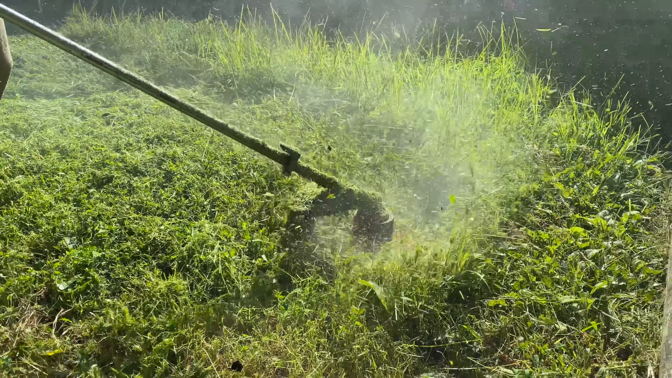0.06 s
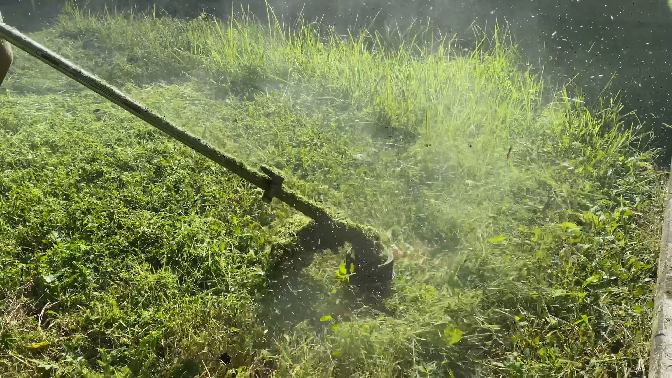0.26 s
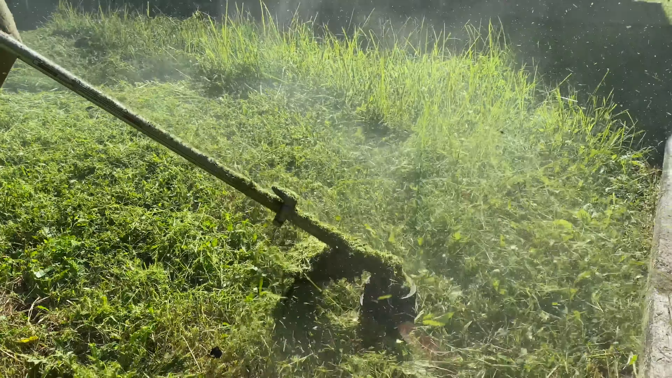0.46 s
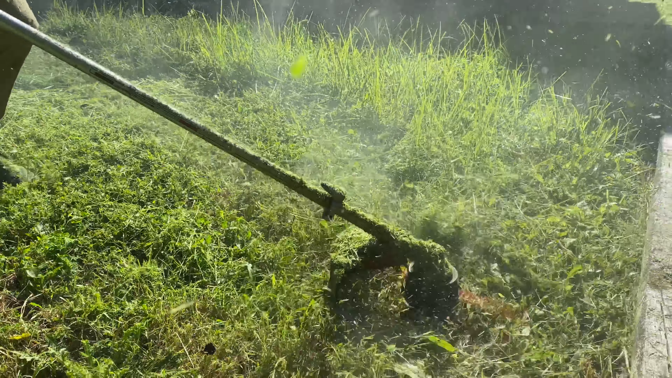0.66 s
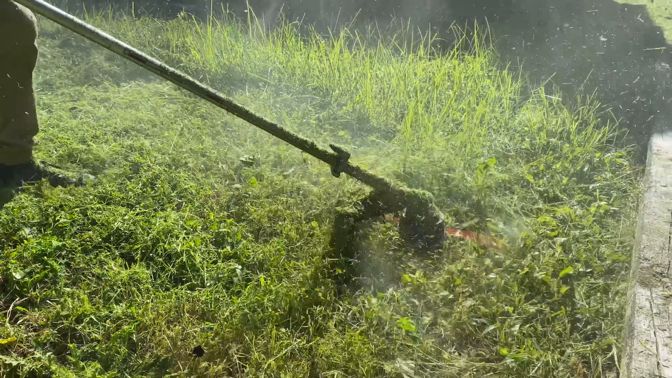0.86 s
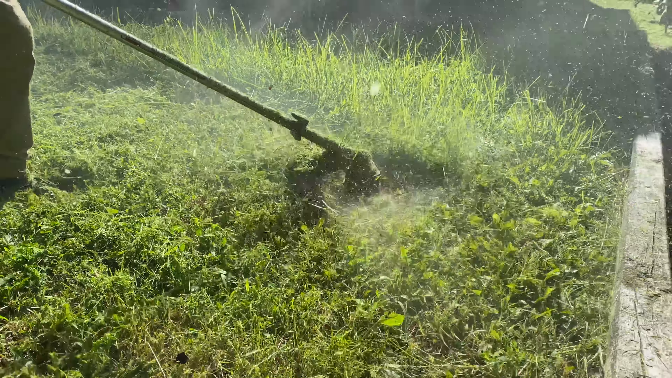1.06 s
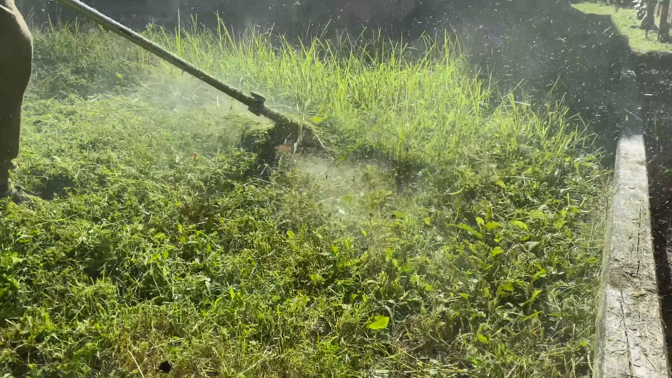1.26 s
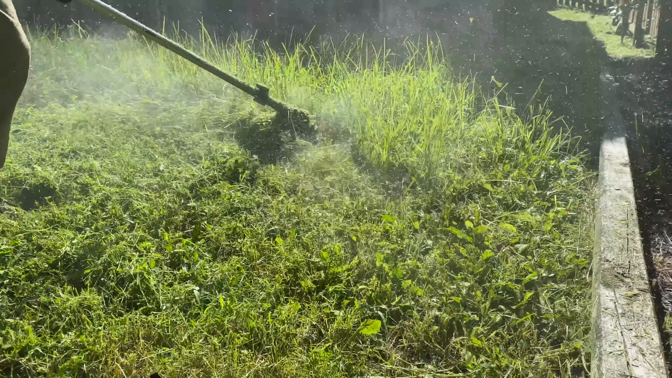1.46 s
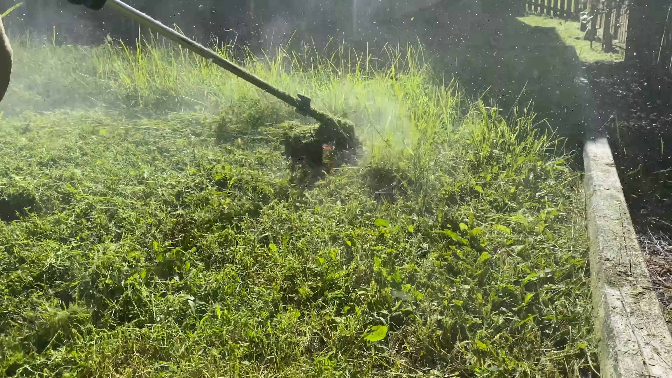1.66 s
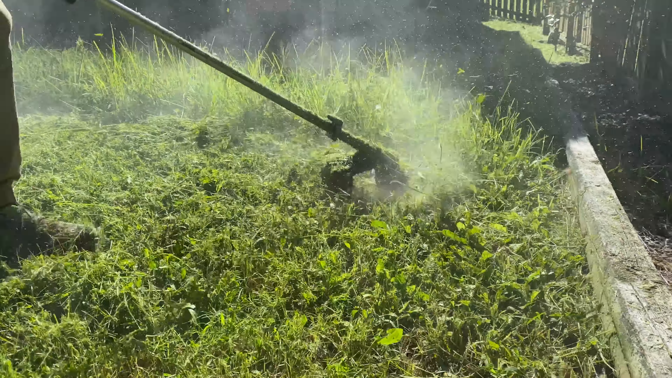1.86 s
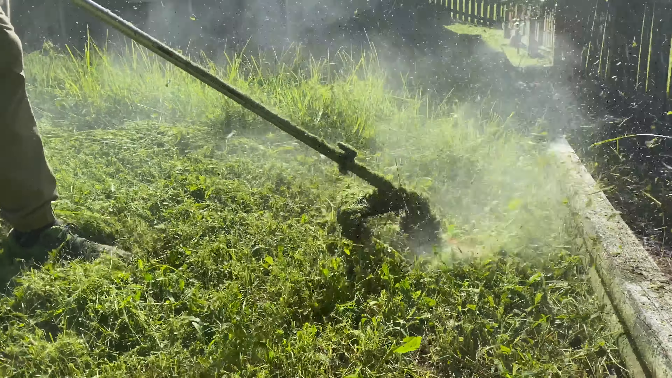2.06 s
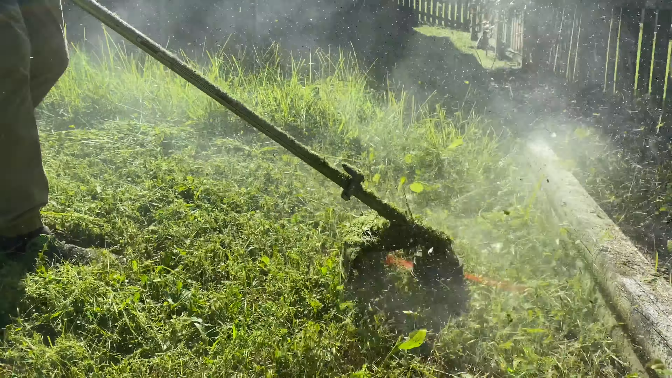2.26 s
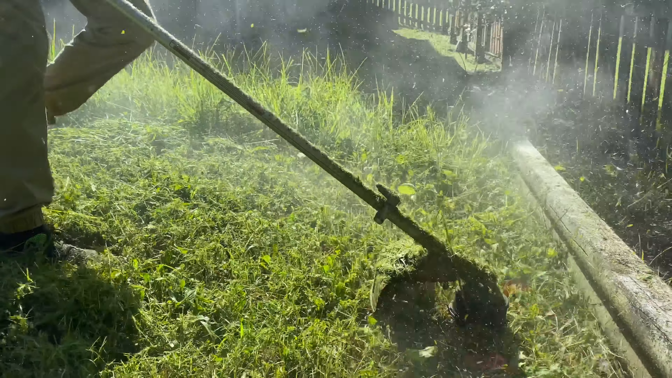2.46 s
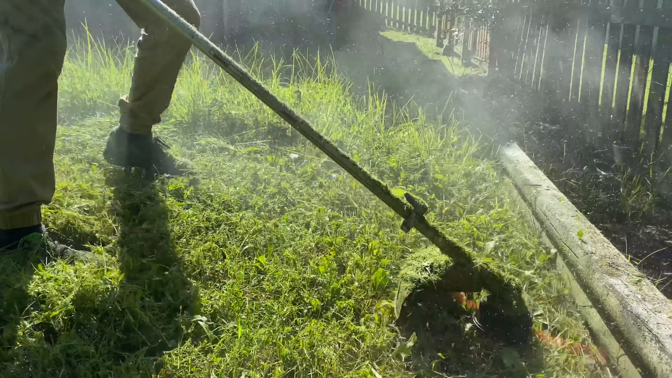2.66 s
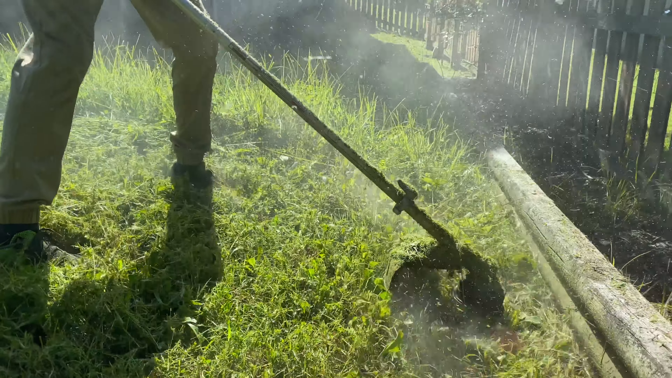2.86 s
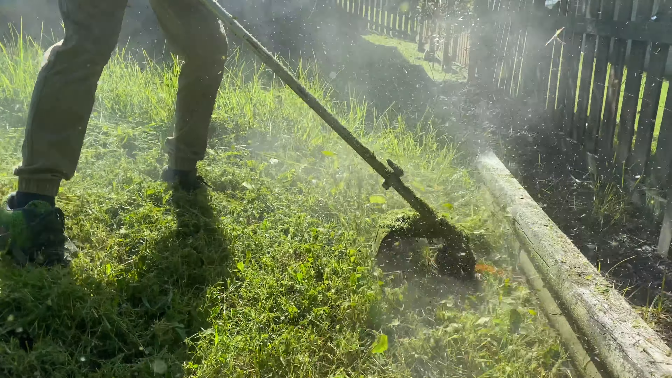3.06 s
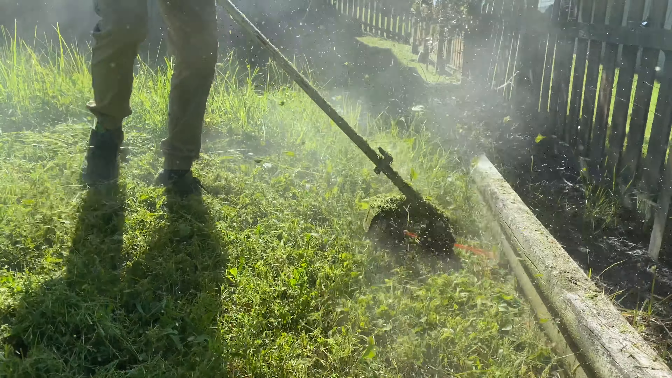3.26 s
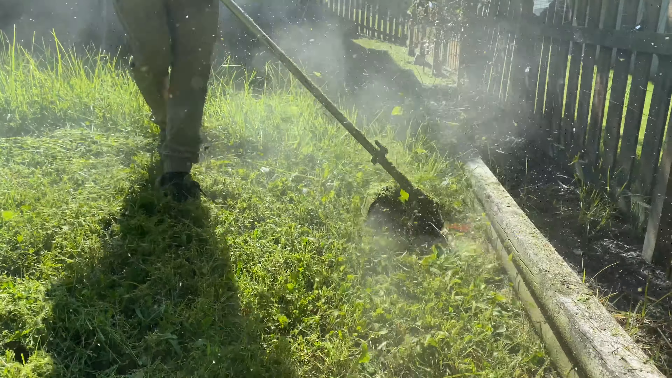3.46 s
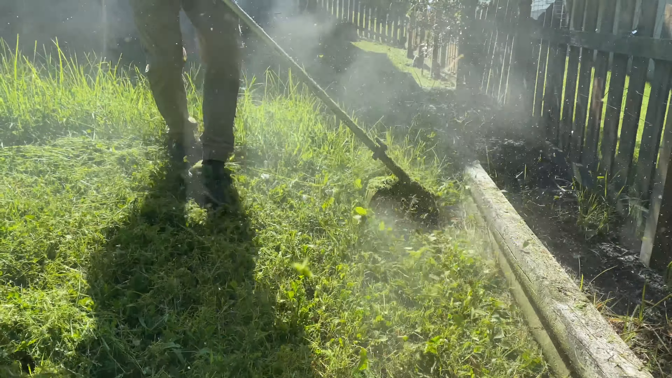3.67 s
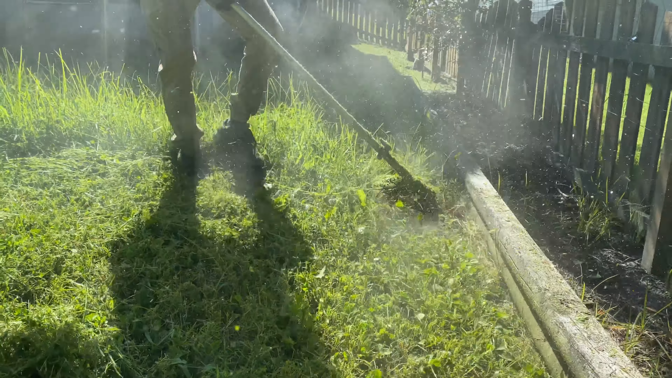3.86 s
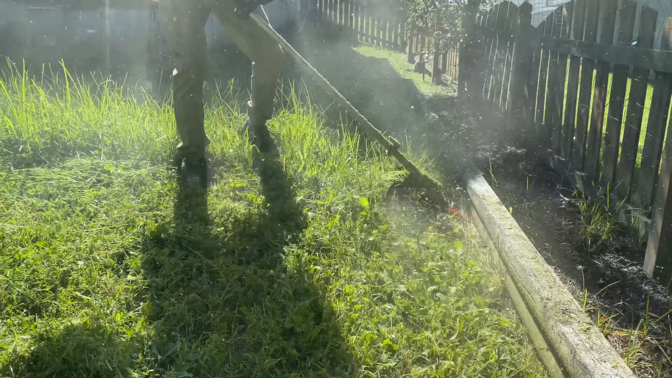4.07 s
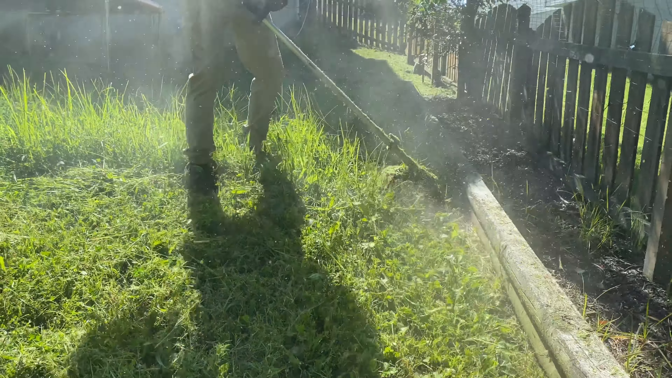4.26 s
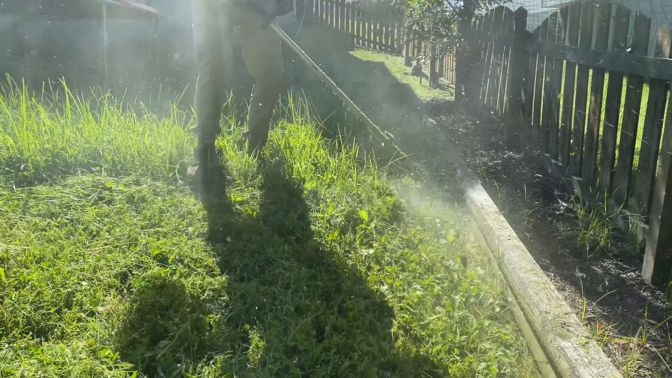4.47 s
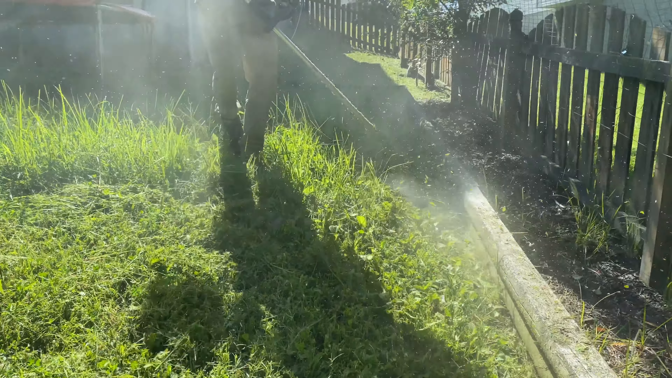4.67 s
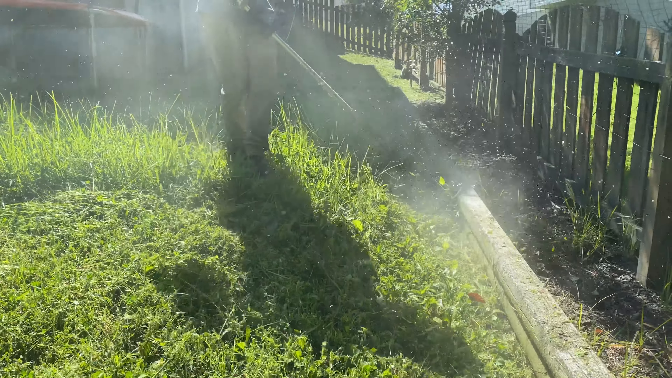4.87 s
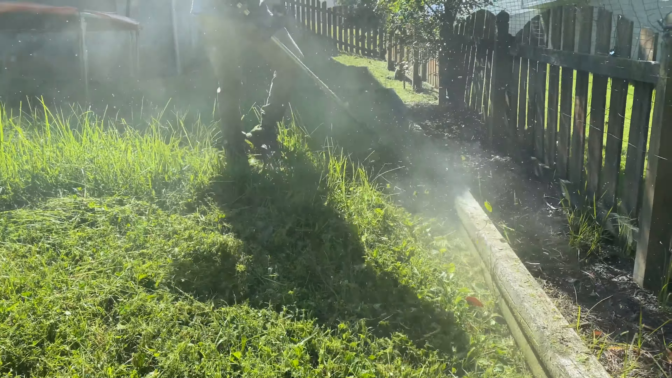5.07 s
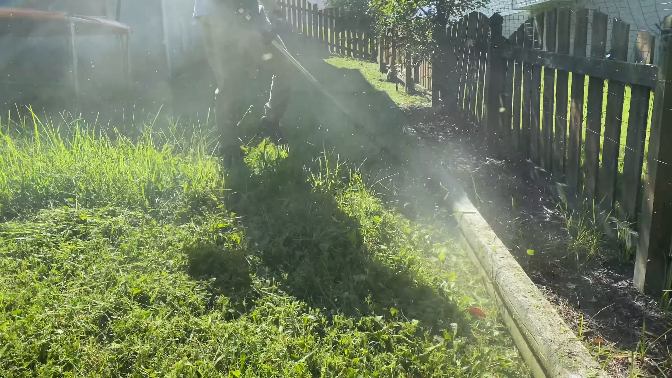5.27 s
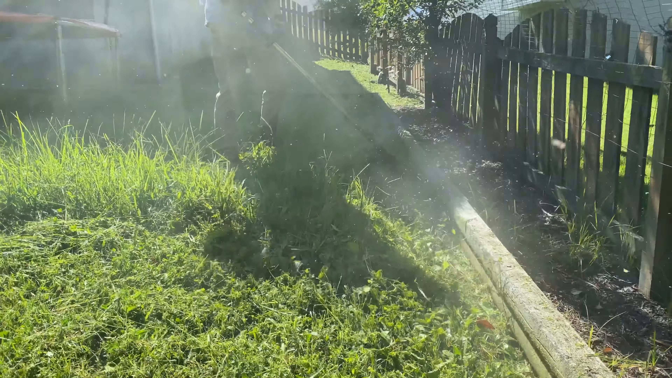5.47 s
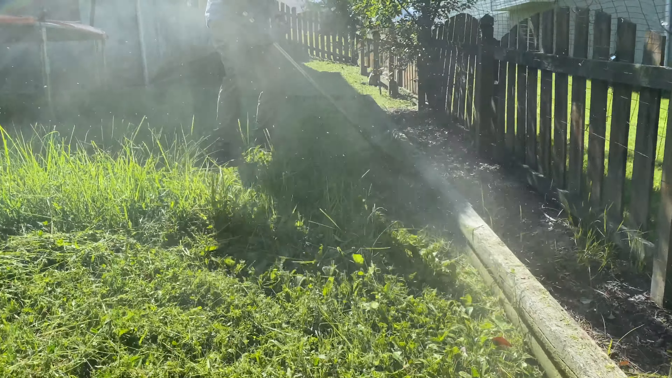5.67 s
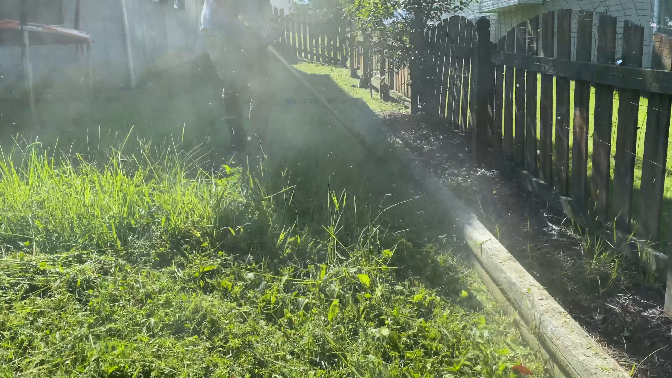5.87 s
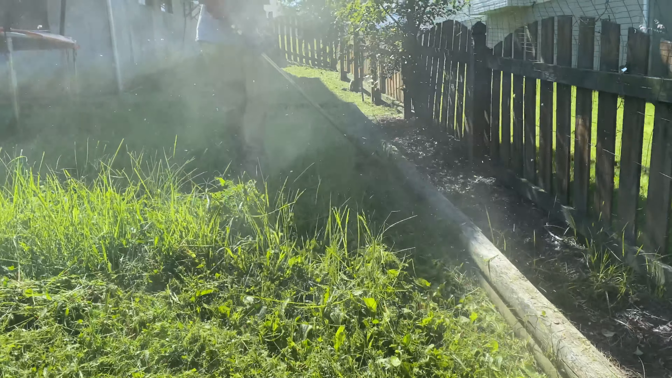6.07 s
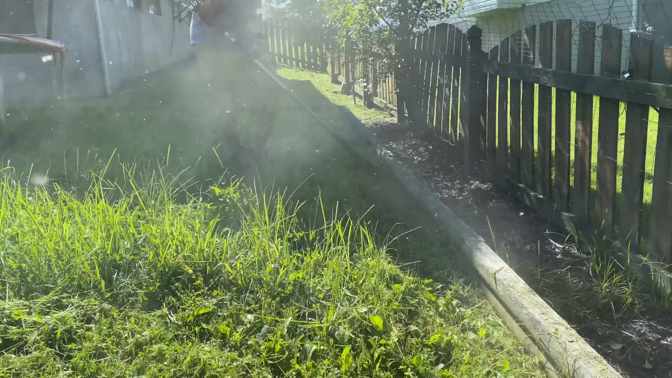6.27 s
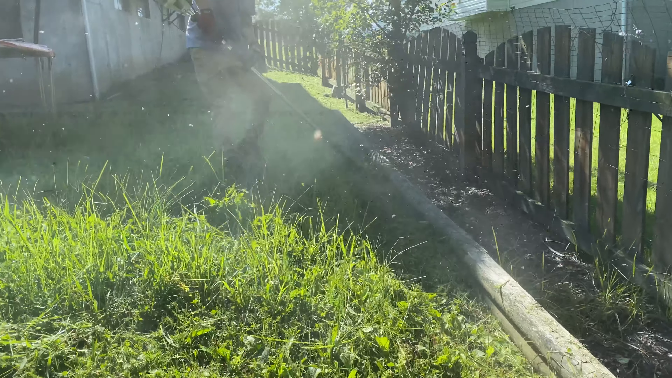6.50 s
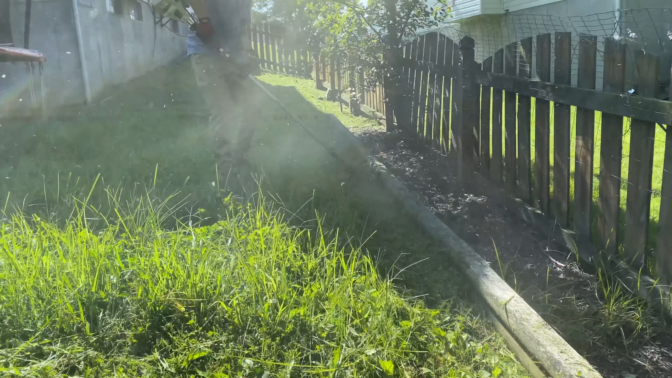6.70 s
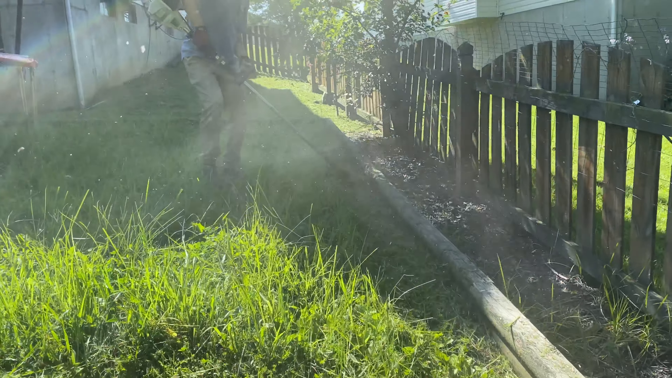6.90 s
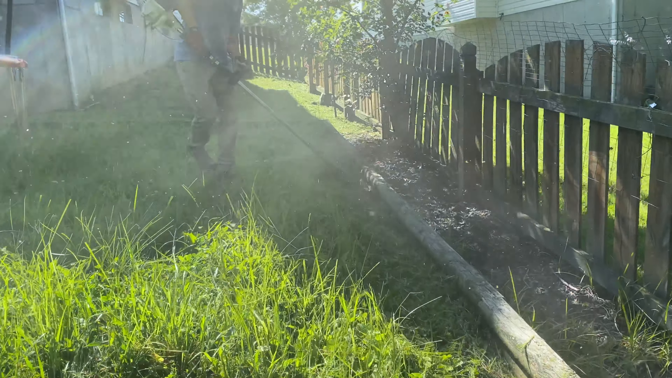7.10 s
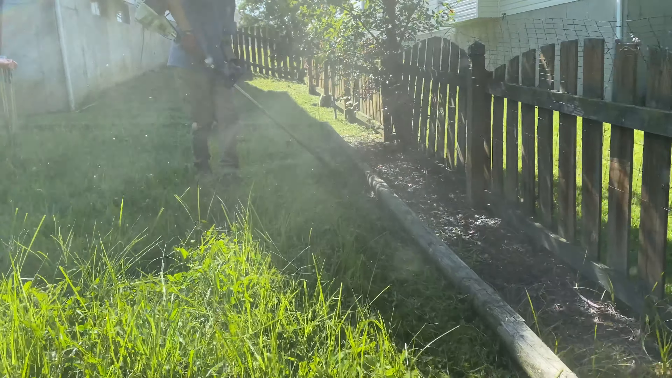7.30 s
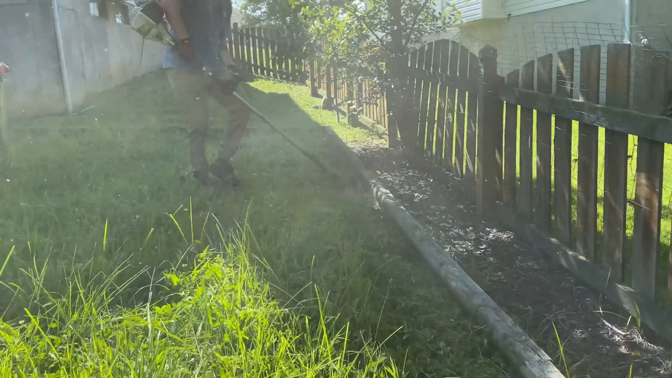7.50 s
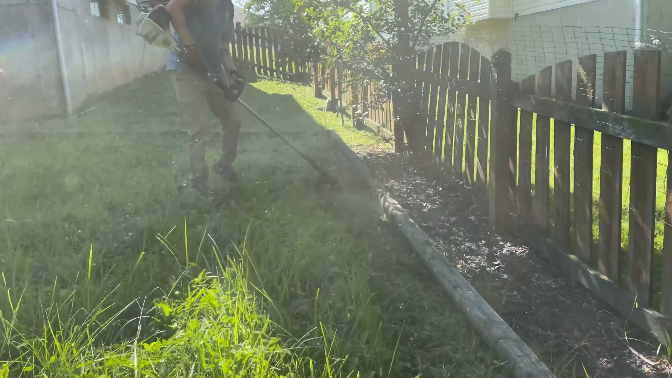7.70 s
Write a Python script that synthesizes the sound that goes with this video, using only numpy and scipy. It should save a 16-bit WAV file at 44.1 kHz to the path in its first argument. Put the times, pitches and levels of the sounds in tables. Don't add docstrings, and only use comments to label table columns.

```python
import sys
import numpy as np
from scipy import signal
from scipy.fft import rfft, irfft, next_fast_len
from scipy.io import wavfile
from scipy.ndimage import uniform_filter1d

SR = 44100
rng = np.random.default_rng(int(sys.argv[2]) if len(sys.argv) > 2 else 0)


def volts(x):
    e = np.asarray(x, float) / 20
    return 10 ** e


def output_pcm(signal):
    pcm = np.clip(np.atleast_2d(signal).T, -1, 1) * 32767
    wavfile.write(sys.argv[1], SR, np.round(pcm).astype(np.int16))


N = 341334

# t/s, firing rate f/Hz
ENGINE_SPEED = [(0, 71.75), (.407, 75.88), (1.065, 75.38), (1.474, 70.3), (1.768, 74.87), (2.102, 73.08),
                (2.276, 73.51), (2.682, 78.38), (3.074, 74.59), (3.508, 75.7), (4.195, 75.89),
                (5.203, 75.22), (5.727, 74.19), (6.244, 76.11), (6.889, 74.64), (7.486, 77.08),
                (7.74, 76.23)]
# t/s, sag f/Hz
BOGS = [
    (1.207, 1.33),
    (2.843, 0.85),
    (3.626, 0.77),
    (4.491, 1.45),
    (5.8, 1.13),
    (6.926, 1.9),
]
BOG_S, FLYWHEEL_S = 0.08, 0.14
# t/s, nearness, turn (both with spread 1)
MUFFLER_POSE = [(0, 1.4, -0.39), (.9, 1.6, 0.087), (1.5, 0.75, 0.26), (1.8, 1.74, -.1), (2.1, 1.2, 1.4),
                (2.4, .6, 1.5), (2.7, 1.2, 2.1), (3.3, 0.8, 1.8), (4.5, 0.47, 1.45), (5.0, 0.26, 1.5),
                (5.4, 0.07, 1.4), (6.0, -0.2, 0.54), (6.3, -0.5, -1.1), (6.7, -0.55, -0.52),
                (7.1, -1, -0.86), (7.5, -0.5, -1.3), (7.74, -1.3, -.8)]
# order (multiple of the firing rate), level/dB,
# dB per nearness, dB per turn
EXHAUST_ORDERS = [(1.0, -40, 0.9, -0.4), (2.0, -36.5, -1.3, -0.5), (3.0, -51.5, 2, -3),
                  (4.0, -46.5, 5.5, 0), (5.0, -44, 3, -0.5), (6.0, -43, -4.6, 2.94), (7.0, -42.5, -1, 2),
                  (8.0, -41, -0.5, 0.06), (9.0, -46.5, -2, -0.3), (10.0, -48.5, 2.5, -3),
                  (11.0, -46, 3, -0.05), (12.0, -54.5, -1, -4), (13.0, -53, 3, 4), (14.0, -48.5, -1.5, 0),
                  (15.0, -84, -19, 24), (16.0, -59.5, -8, -6),
                  (16.8, -50, -2, -0.5), (17.9, -58, -0.5, 0.5), (18.72, -62.5, -4, 5), (19.33, -52, -7, 2.5),
                (20.9, -62.5, -8, 2), (22, -55.5, -8.5, 2)]
# f/Hz, level/dB per Hz
RUMBLE_COLOUR = [(40, -32), (70, -7), (100, -9), (180, -12), (300, -8), (500, -2), (800, 1.5), (1200, -4.5),
                 (2000, -15.5)]
# f/Hz, level/dB per Hz
RASP_COLOUR = [(900, -3.5), (1500, -8.5), (2000, 2), (2700, -2), (3600, 0), (5000, 1.5), (7000, -2),
               (12000, -44), (15500, -8)]
# f/Hz, level/dB per Hz
MUFFLER_COLOUR = [(1900, -20), (2400, -9), (2750, -5.5), (3100, -5), (3600, -35)]
GEAR = 2.856
# t/s, closeness as spray level/dB, disc tilt to listener/dB
SWEEP = [(0, -31, -3), (.3, -28, 4), (.43, -26, -3), (.6, -26, -4), (.75, -25, -3), (1.0, -29.5, 1.5),
         (1.36, -36, 1), (1.8, -32, 3.5), (2.25, -28, 5.5), (2.55, -28, 0), (3.0, -28, -4), (3.5, -31.5, 0),
         (4.27, -34, 1), (5.2, -34, 0), (5.95, -36.5, -1), (6.4, -34, 1.5), (7.0, -34.5, -3),
         (7.74, -31.5, 2.5)]
# f/Hz, level/dB per Hz
SPRAY_COLOUR = [(2500, -5.5), (4500, -4.5), (6000, 0.5), (7500, 2.5), (9500, 1), (11500, 0), (13500, -0.5),
                (15500, -2.5)]
BRIGHTER_WHEN_CLOSE = 0.36
# f/Hz, level/dB per Hz
CHURN_COLOUR = [(110, -22), (190, -3), (280, -2), (420, -1), (750, -20)]
MEAN_SPRAY_DB, MEAN_SPEED_HZ = -32, 75
# level/dB at mean closeness, dB per dB of closeness, dB per Hz of speed,
# dB per nearness, dB per turn, dB per dB of tuft swell
LINE_TONE_DRIVE = (-40.5, 0.35, 0.9, 2, 0.1, -1.6)
LINE_OCTAVE_DRIVE = (-44.5, 0.5, 0.6, 1.6, -0.6, -0.6)
RASP_DRIVE = (-36.5, 0.03, -0.14, 2.34, -0.53, 2.14)
RUMBLE_DRIVE = (-37, 0.32, -0.1, -1.2, 0.04, 1.6)
CHURN_DRIVE = (-44.5, 0.15, -1.3, 2, 0.6, 3)
# order, level/dB
MOWER_ORDERS = [(2, -41), (3, -49.5), (4, -50), (5, -42), (6, -48.5), (7, -55), (8, -55)]
# t/s, f/Hz over its governed rate
MOWER_WANDER = [(0, 0), (2, 0), (2.4, .16), (2.85, 0), (3.5, -.185), (3.8, 0), (4.3, -.035), (4.7, 0),
                (5.6, .08), (6.5, 0), (6.9, -.085), (7.3, 0), (7.74, .29)]
MOWER_HZ = 29.057
HUNT_HZ, HUNT_PERIOD_S, HUNT_TOP_S = 0.2, 2.051, 0.678
# t/s, peak level/dB, body below 6 kHz against the peak/dB
SNAPS = [(0.0672, -11, -13), (0.1401, -12, -17), (0.179, -11, -9), (0.2404, -11, -18), (0.2633, -13, -15),
         (0.3002, -12, -15), (0.384, -10, -15), (0.4489, -7, -21), (0.4768, -12, -17), (0.5048, -8, -19),
         (0.5506, -11, -18), (0.5786, -11, -17), (0.6245, -11, -17), (0.6614, -11, -15), (0.6983, -12, -14),
         (0.7726, -11, -14), (0.9388, -11, -15), (1.0335, -14, -16), (1.8662, -12, -16), (2.0078, -11, -16),
         (2.2204, -14, -12), (2.3645, -11, -18), (2.3925, -13, -16), (2.5666, -11, -19), (2.6748, -11, -18),
         (2.799, -8, -15), (2.9597, -11, -14), (3.049, -10, -14), (6.9356, -13, -18), (6.9925, -16, -18)]
# t/s, peak level/dB, first pitch f/Hz, time to fall 60 dB/s
THUMPS = [
    (0.075, -16.5, 1260, 0.13),
    (0.395, -30, 300, 0.023),
    (.436, -24, 120, 0.08),
    (.875, -29, 130, .08),
    (.948, -30, 100, 0.092),
    (2.34, -40, 90, .1),
    (2.81, -20, 327, 0.092),
    (2.96, -33, 100, .08),
    (3.385, -35, 130, .1),
    (7.334, -28, 90, 0.09),
]
# t/s, swell level/dB
TUFTS = [(.19, 3.5), (.4, 2.5), (1.185, 2.5), (.82, 1.5), (.945, 1.5), (1.87, 2.5), (2.22, 2), (2.8, 3),
         (2.96, 2.5), (3.05, 1.5), (3.55, 0.5), (3.86, 0.5), (4.5, 2.5), (4.75, 1), (6.6, 2.5), (6.9, 2),
         (6.96, 2.5), (7.5, 0.5), (7.73, 2)]
BITE_S, CLEAR_S = 0.014, 0.018
# f/Hz, phase/rad
SIDE_TURN = [(0, 0), (100, -.07), (200, -.2), (500, -.75), (1600, -2.7), (1850, -4.3), (2800, -5.5),
             (3500, -5.2), (4900, -6.28), (6000, -4.55), (7000, -3.8), (8250, -3.14), (10000, -1.8),
             (12750, 0), (15800, 2.1), (22050, 5)]
# f/Hz, level/dB
LEFT_OVER_RIGHT = [(100, 0), (300, 1), (900, 5), (1500, 5), (2200, -1), (3000, 2), (4500, 1.5), (6000, -.5),
                   (8000, 0)]
# f/Hz, level/dB against direct
SCATTER = [(600, -6), (1300, 1), (2500, -1.5), (4300, -4), (5500, -3), (8000, -22), (11000, -10.5),
           (16000, -49)]
# 0 sum or 1 difference, low f/Hz, high f/Hz, share of frames dropped
DROPPED_BANDS = [ (0, 6900, 7250, .4), (0, 7250, 7600, .6), (0, 7600, 8270, 1), (0, 8270, 8850, .97),
                 (1, 11750, 12400, .99), (1, 12400, 13750, .98), (1, 4750, 5150, .3), (1, 4400, 4750, .2),
                 (1, 4050, 4300, .12), (1, 3500, 3800, .12), (1, 2850, 3100, .14), (0, 2900, 3100, .03)]
TOP_HZ = 15800


def rms_one(x):
    return x / np.sqrt(np.mean(x ** 2) + 1e-20)


def in_time(rows):
    s, *columns = np.transpose(rows)
    return [np.interp(np.arange(N) / SR, s, c) for c in columns]


def at_hz(points, hz):
    table_hz, db = np.transpose(points)
    return np.interp(np.log(hz + 1), np.log(table_hz), db)


def colour(x, spectrum):
    size = next_fast_len(N)
    gain = volts(at_hz(spectrum, np.fft.rfftfreq(size, 1 / SR)))
    return rms_one(irfft(rfft(x, size) * gain, size)[:, :N])


def drift(rate):
    r = np.exp(-80 * np.pi * rate / SR)
    noise = rng.standard_normal(N // 40 + 2002)
    slow = signal.lfilter([1], [1, -2 * r, r * r], noise)[2000:]
    return np.interp(np.arange(N) / 40, np.arange(len(slow)), rms_one(slow))


def turns(hz):
    return 2 * np.pi * np.cumsum(hz) / SR


def tone(phase, db, wobble_db, wobble_rad):
    strength = np.sqrt(2) * volts(db + wobble_db * drift(7.1))
    return strength * np.cos(phase + wobble_rad * drift(14.3))


def beat(phase, depth_db):
    return volts(depth_db * np.cos(phase))


def grains(per_s, spread_db, low_hz, high_hz, cycles):
    sizes = volts(spread_db * np.minimum(rng.exponential(1, N), 4.5)) * (rng.random(N) < per_s / SR)
    clicks = sizes * rng.choice([-1, 1], (2, N)) + 1e-18
    dealt, out = rng.integers(0, 9, N), 0
    for k, hz in enumerate(np.geomspace(low_hz, high_hz, 9)):
        r = volts(-60 * hz / (cycles * SR))
        resonance = [1, -2 * r * np.cos(2 * np.pi * hz / SR), r * r]
        ring = signal.lfilter([1, 0, -1], resonance, clicks * (dealt == k))
        out = out + rms_one(ring) * np.sqrt(hz)
    return rms_one(out)


def speed():
    hz = uniform_filter1d(in_time(ENGINE_SPEED)[0], size=round(FLYWHEEL_S * SR), mode="nearest")
    for s, sag_hz in BOGS:
        since = np.maximum(np.arange(N) / SR - s, 0) / BOG_S
        hz = hz - sag_hz * since * np.exp(1 - since)
    return hz


def exhaust(firing, nearness, turn):
    uneven, out = firing + 0.006 * drift(25), 0
    for order, db, near_db, turn_db in EXHAUST_ORDERS:
        shift = 2.1 * order - 9 + 12.4 * np.exp(-order / 2.2) + np.pi * (order in (3, 5))
        level_db = db + near_db * nearness + turn_db * turn
        wobble_db, wobble_rad = 0.5 + 0.06 * order, 0.013 * order
        out = out + tone(order * uneven + shift, level_db, wobble_db, wobble_rad)
    return out


def rumble(firing, level_db):
    puffs = beat(firing, depth_db=3.0) * volts(0.5 * drift(9.7))
    return volts(level_db) * colour(rng.standard_normal((2, N)) * puffs, RUMBLE_COLOUR)


def rasp(firing, passes, level_db, clumps):
    gate = beat(firing, depth_db=1.0) * beat(2 * firing, depth_db=0.9) * beat(passes, depth_db=1.0)
    rattle = grains(1500, spread_db=2.5, low_hz=1220, high_hz=6800, cycles=11.4)
    rough = rng.standard_normal((2, N)) + 0.4 * rattle
    lumps = volts(0.8 * clumps + 1.2 * drift(65))
    return volts(level_db + 1.1) * colour(rough * gate * lumps, RASP_COLOUR)


def ground_echo(x, nearness):
    lag = SR * (0.00071 + 0.00002 * nearness + 0.00002 * drift(2.5))
    t = np.arange(N)
    return x + 0.18 * np.array([np.interp(t - lag, t, row) for row in x])


def muffler_ring(firing, nearness, turn):
    puffs = rng.standard_normal((2, N)) * beat(firing, depth_db=-3.0)
    knocks = 2.0 * rms_one(volts(9000 * (np.cos(firing) - 1)))
    return volts(-44 - 1.9 * nearness + 0.3 * turn) * colour(puffs + knocks, MUFFLER_COLOUR)


def line_tone(passes, tone_db, octave_db):
    main = tone(passes, tone_db, 0.87, 0.051)
    octave = tone(2 * passes, octave_db, 1.7, 0.48)
    half = tone(passes / 2, tone_db - 21, 2.5, 0.17)
    third = tone(3 * passes, octave_db - 7, 3.0, 0.44)
    return main + octave + half + third


def spray(firing, passes, level_db, clumps):
    gate = beat(passes, depth_db=1.5) * beat(passes / 2, depth_db=0.6) * beat(firing, depth_db=0.6)
    per_s = 1200 * volts(2.3 * clumps)
    fine = grains(per_s, spread_db=2.0, low_hz=4000, high_hz=15600, cycles=6.9)
    crackle = rng.standard_normal((2, N)) + 0.51 * fine
    hiss = colour(crackle * gate * volts(0.5 * clumps + 0.45 * drift(75)), SPRAY_COLOUR)
    treble = hiss - uniform_filter1d(hiss, size=3)
    extra = volts(BRIGHTER_WHEN_CLOSE * (level_db - MEAN_SPRAY_DB)) - 1
    return volts(level_db + 4.5) * (hiss + extra * treble)


def churn(level_db):
    return volts(level_db + 1.3 * drift(6.9)) * colour(rng.standard_normal((1, N)), CHURN_COLOUR)[0]


def mower():
    hunt_hz = HUNT_HZ * np.cos(2 * np.pi * (np.arange(N) / SR - HUNT_TOP_S) / HUNT_PERIOD_S)
    firing = turns(MOWER_HZ + hunt_hz + in_time(MOWER_WANDER)[0]) + 0.15
    return sum(tone(order * firing - 1.7, db, 0.89, 0.04) for order, db in MOWER_ORDERS)


def snaps():
    out, t = np.zeros(N + 200), np.arange(200) / SR
    bright = signal.butter(2, 6500, "high", fs=SR, output="sos")
    body = signal.butter(2, [1500, 6500], "band", fs=SR, output="sos")
    for s, db, body_db in SNAPS:
        crack = rng.standard_normal(200) * np.exp(-t / 0.00055)
        top, low = signal.sosfilt(bright, crack), signal.sosfilt(body, crack)
        both = top / abs(top).max() + volts(body_db + 4) * low / abs(low).max()
        at = round(s * SR)
        out[at:at + 200] += volts(db + 6) * both
    return out[:N]


def thumps():
    out, t = np.zeros(N + 8000), np.arange(8000) / SR
    for s, db, hz, t60 in THUMPS:
        pitch = 40 + (hz - 40) / (1 + t / 0.0013)
        onset = 1 - np.exp(-t / 0.00016)
        at = round(s * SR)
        out[at:at + 8000] += volts(db - 60 * t / t60) * np.sin(turns(pitch)) * onset
    return out[:N]


def tufts():
    coarse = np.arange(0, N, 32)
    s, db = np.transpose(TUFTS)
    since = coarse[:, None] / SR - s
    swell = np.exp(np.minimum(since / BITE_S, -since / CLEAR_S)) @ db
    return np.interp(np.arange(N), coarse, swell)


def ports(point, wide):
    size = next_fast_len(N + 4096)
    hz = np.fft.rfftfreq(size, 1 / SR)
    side = np.array([[-1], [1]])
    wet = volts(at_hz(SCATTER, hz)) * np.minimum(hz / 600, 1) ** 1.5
    shared, apart = rfft(wide, size)
    heard = rfft(point, size) + (shared + side * wet * apart) / np.sqrt(1 + wet ** 2)
    turn = np.exp(0.5j * side * np.interp(hz, *np.transpose(SIDE_TURN)))
    balance = volts(-side * at_hz(LEFT_OVER_RIGHT, hz) / 2)
    return irfft(heard * turn * balance, size)[:, :N]


def scene():
    speed_hz = speed()
    firing = turns(speed_hz) - 0.475
    passes, clumps = GEAR * firing + 0.1, drift(18)
    spray_db, tilt_db = in_time(SWEEP)
    nearness, turn = in_time(MUFFLER_POSE)
    swell_db = tufts()
    controls = np.array([np.ones(N), spray_db - MEAN_SPRAY_DB, speed_hz - MEAN_SPEED_HZ,
                         nearness, turn, swell_db])
    drives = np.array([LINE_TONE_DRIVE, LINE_OCTAVE_DRIVE, RASP_DRIVE, RUMBLE_DRIVE, CHURN_DRIVE])
    tone_db, octave_db, rasp_db, rumble_db, churn_db = drives @ controls

    point = exhaust(firing, nearness, turn)
    point = point + line_tone(passes, tone_db + tilt_db, octave_db - 0.33 * tilt_db)
    point = point + churn(churn_db) + mower() + snaps() + thumps()
    wide = rumble(firing, rumble_db)
    wide = wide + ground_echo(rasp(firing, passes, rasp_db, clumps), nearness)
    wide = wide + muffler_ring(firing, nearness, turn)
    wide = wide + spray(firing, passes, spray_db + 0.5 * swell_db, clumps)
    return ports(point, wide)


def band_limit(x):
    return signal.sosfilt(signal.butter(12, 16340, fs=SR, output="sos"), x)


def record(dry):
    bass_cut = signal.butter(3, 36, "high", fs=SR, output="sos")
    left, right = signal.sosfilt(bass_cut, 0.8 * np.tanh(dry / 0.8))
    hz, _, frames = signal.stft([left + right, left - right], SR, nperseg=2048, noverlap=1536)
    frames[:, hz > TOP_HZ] = 0
    power = np.abs(frames) ** 2
    nearby = uniform_filter1d(power.sum(axis=0), size=24, axis=0)
    masked = uniform_filter1d(power, size=3, axis=1) < 0.12 * nearby
    frames[masked & ((hz > 1300) & (hz < 6900))[:, None]] = 0
    count = frames.shape[2]
    chance = np.repeat(rng.random(count), 2)[:count]
    for which, low_hz, high_hz, share in DROPPED_BANDS:
        band = (hz >= low_hz) & (hz < high_hz)
        frames[which, band] *= np.roll(chance, which * low_hz) > share
    mid, side = signal.istft(frames, SR, nperseg=2048, noverlap=1536)[1][:, :N] / 2
    return band_limit(np.array([mid + side, mid - side]))


dry = scene()
out = record(dry)
output_pcm(out)
```